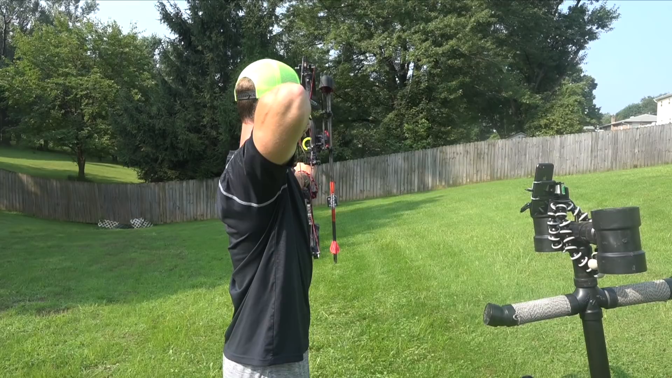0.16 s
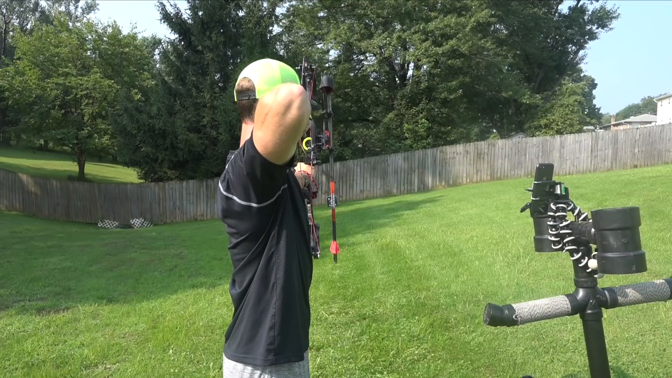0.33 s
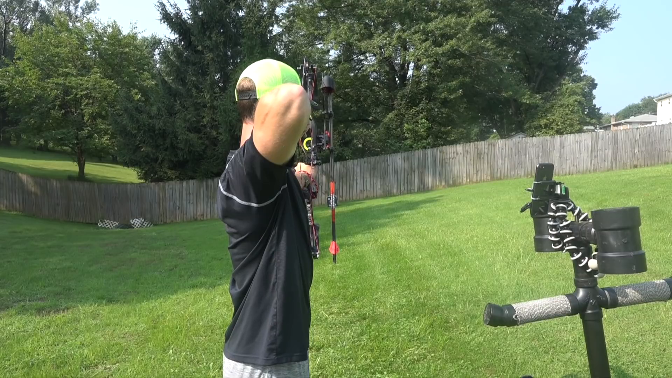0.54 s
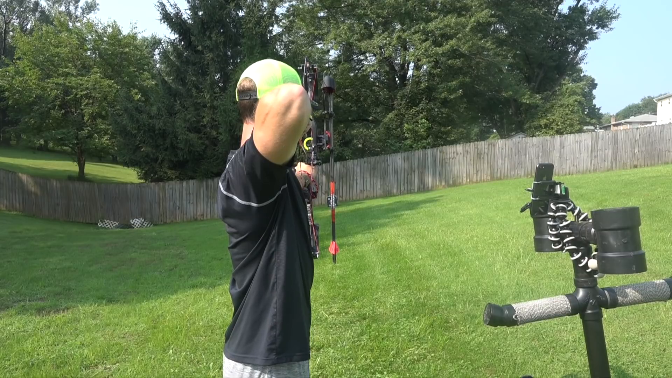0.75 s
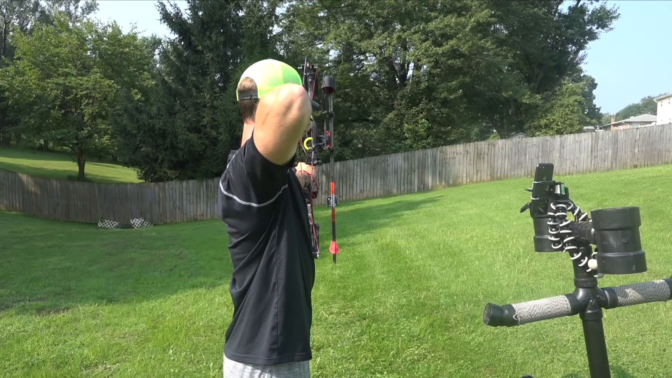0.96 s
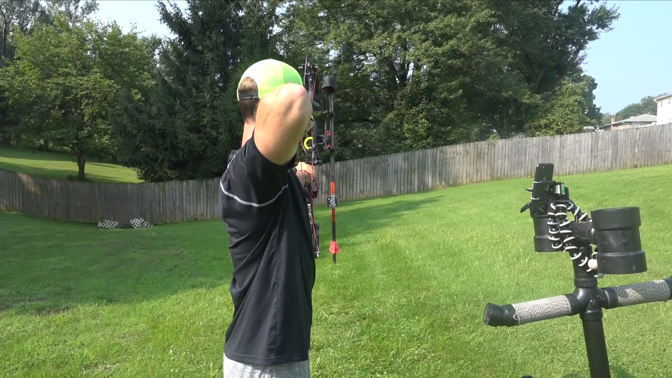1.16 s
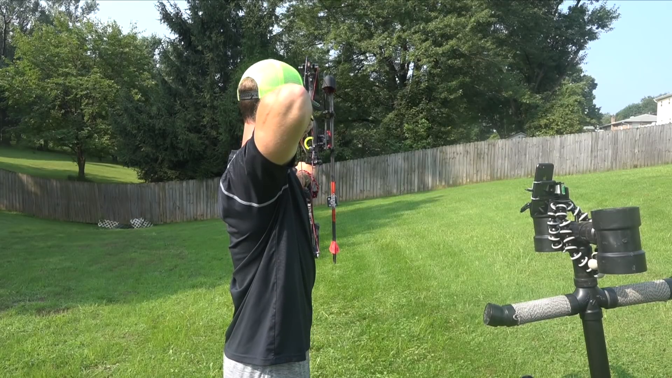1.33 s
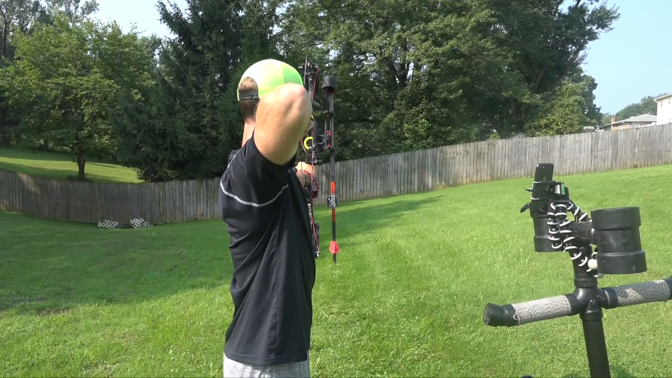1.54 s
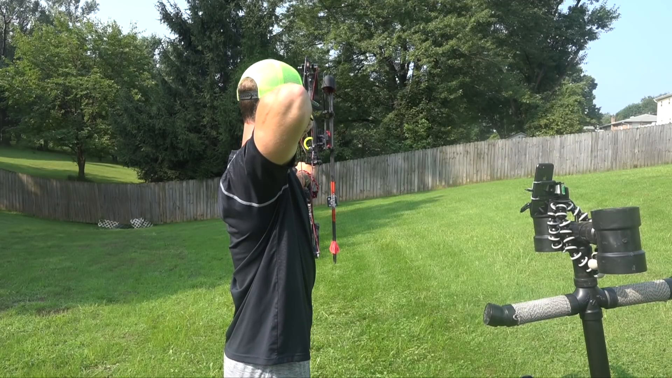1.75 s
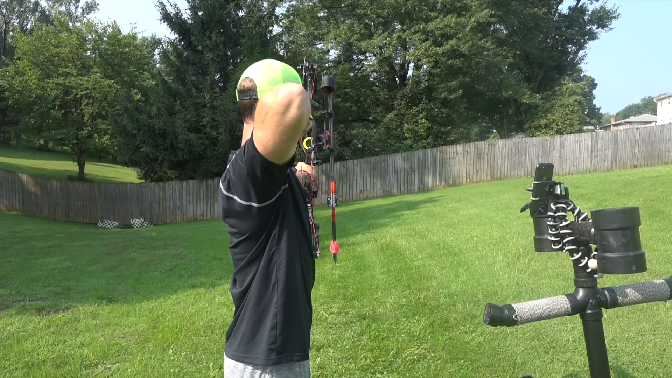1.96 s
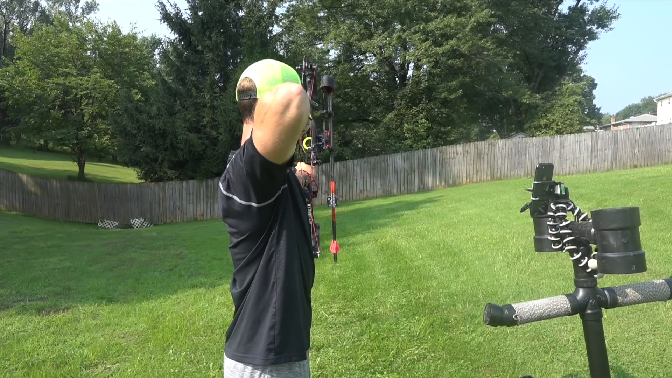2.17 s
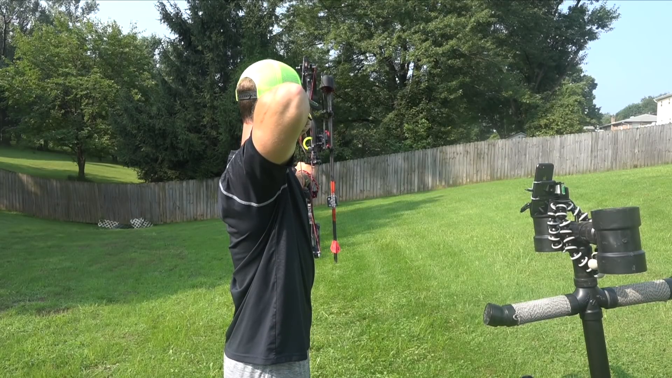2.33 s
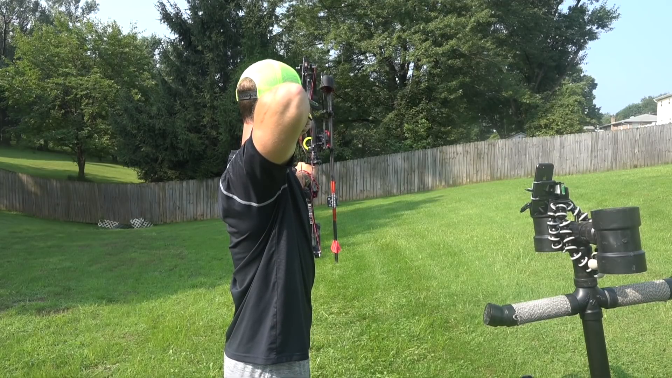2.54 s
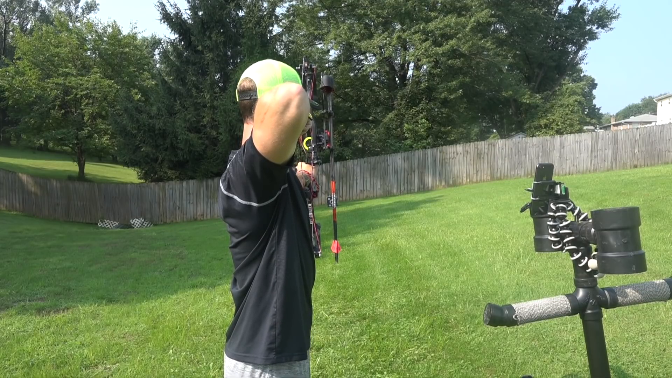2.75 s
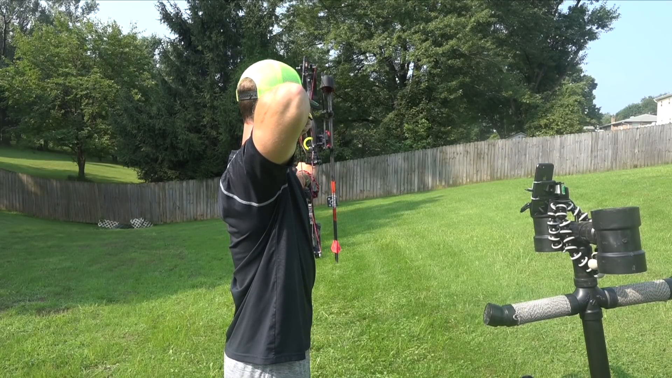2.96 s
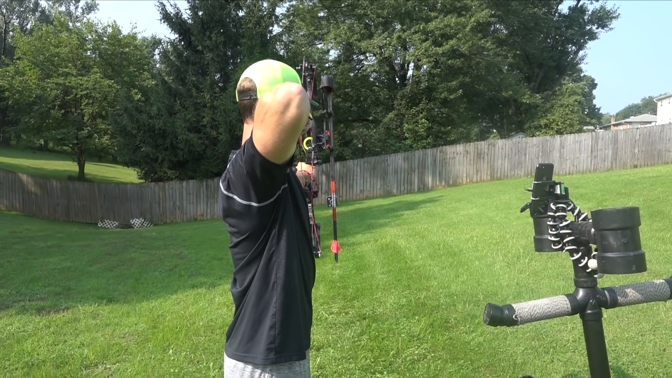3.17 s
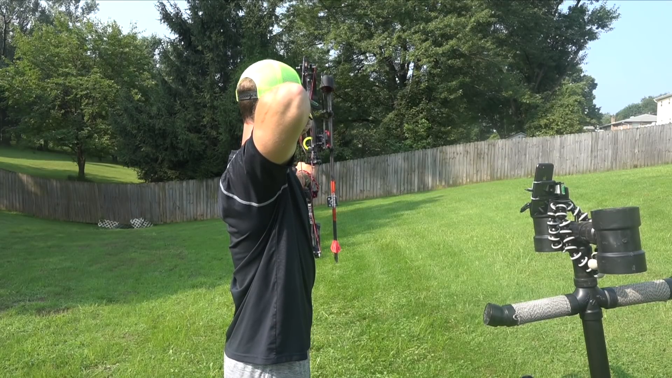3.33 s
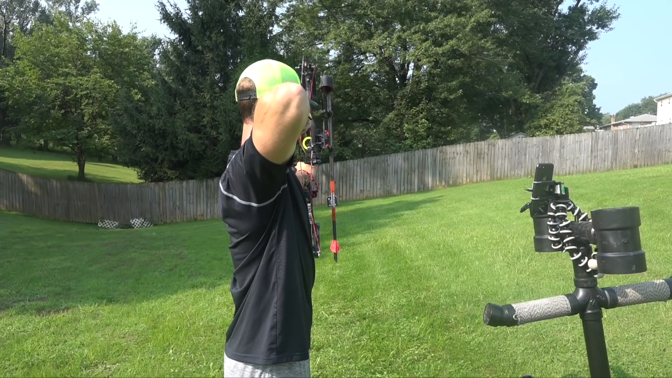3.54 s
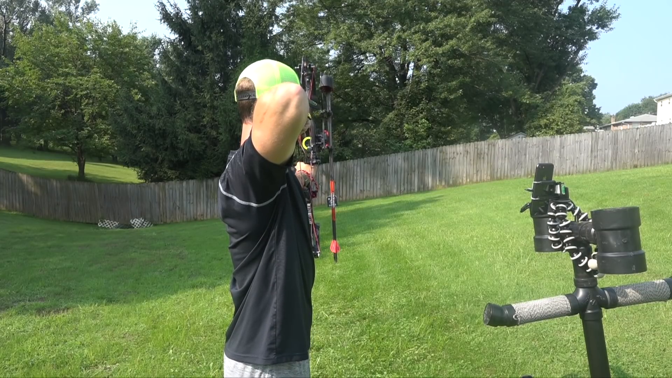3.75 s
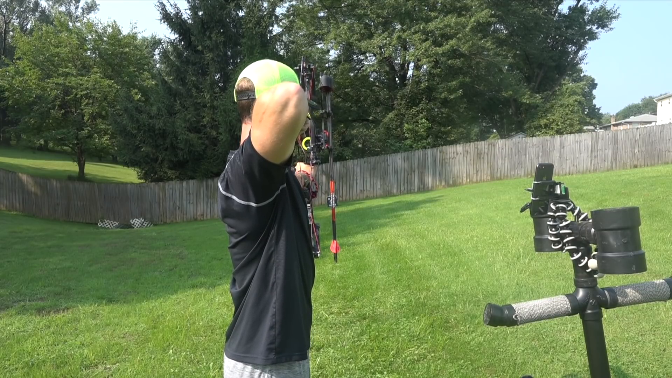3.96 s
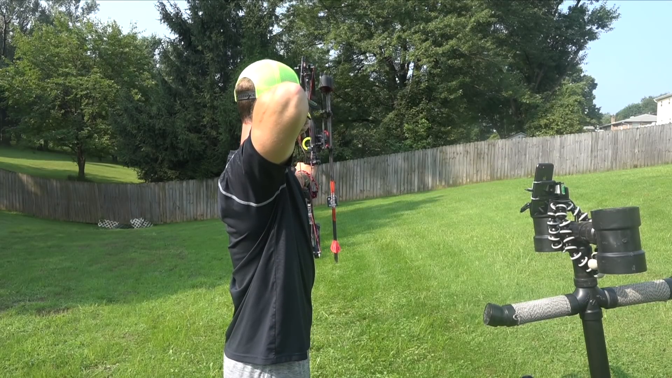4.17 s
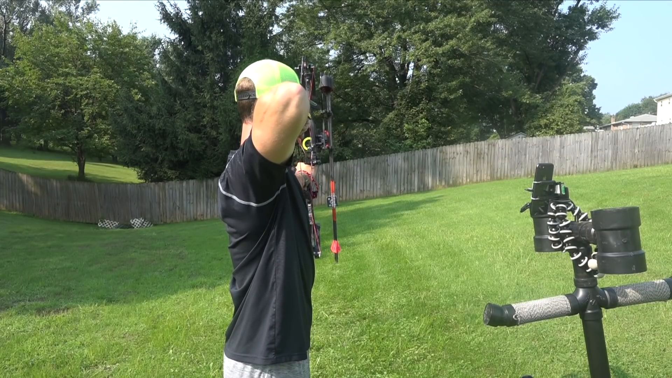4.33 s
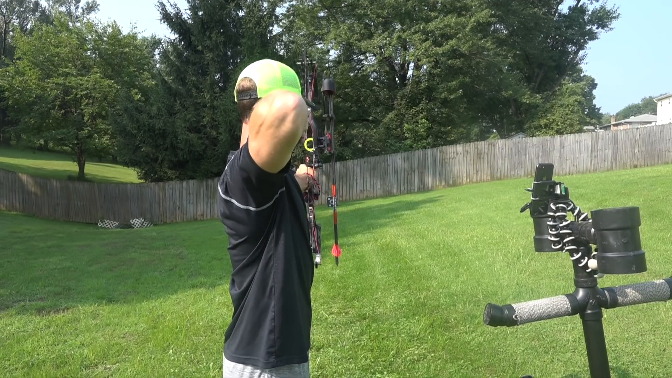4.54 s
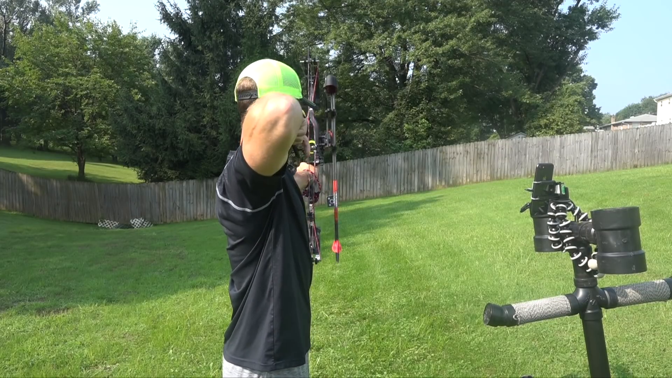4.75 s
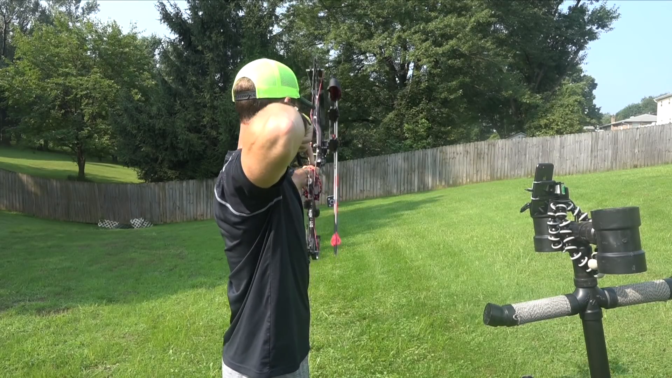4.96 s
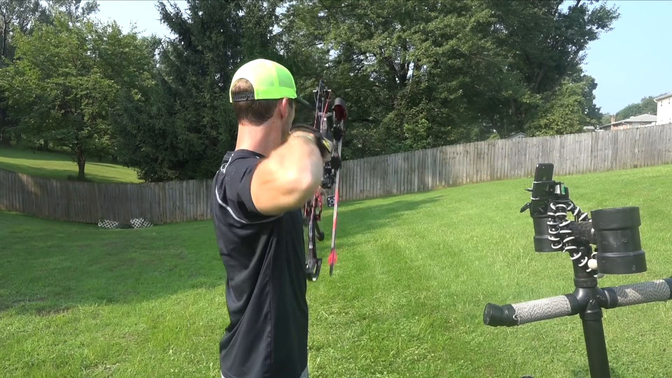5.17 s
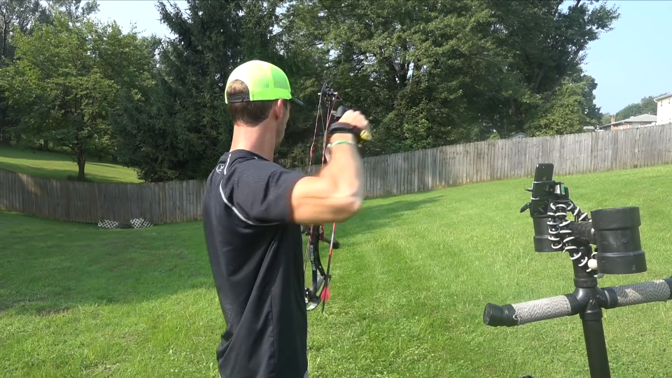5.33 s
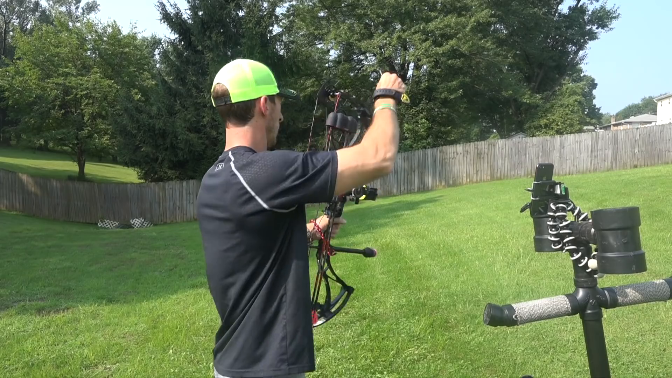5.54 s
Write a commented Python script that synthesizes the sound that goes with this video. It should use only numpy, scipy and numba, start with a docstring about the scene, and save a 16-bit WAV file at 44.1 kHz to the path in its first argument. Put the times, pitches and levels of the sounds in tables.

```python
"""A backyard. A compound bow is shot: the release clicks, the string slams into its stop and rings
the limbs, a fence echoes the cracks and the arrow thuds into a foam target. A bird whistles, a cricket
and a katydid stroke their wings, far traffic and insect choirs rush, wind buffets the microphone ports.
A gain control ducks on the loud blows and creeps back."""
import sys
import numpy as np
from scipy import signal
from scipy.fft import rfft, irfft, next_fast_len
from scipy.io import wavfile
from scipy.ndimage import uniform_filter1d, map_coordinates
from numba import njit

SR = 44100
rng = np.random.default_rng(int(sys.argv[2]) if len(sys.argv) > 2 else 0)


def wav_out(sig):
    """Save sig, one row per channel (or a flat mono array), as 16-bit PCM at SR to the path in sys.argv[1]."""
    wavfile.write(sys.argv[1], SR, np.round(np.clip(np.atleast_2d(sig).T, -1, 1) * 32767).astype(np.int16))


N = 251325

# Release jaw, string stop, cable slaps. Each row: start in seconds, relative level in dB, t60 in seconds.
BOW_CONTACTS = [(4.4212, -6, 0.0097), (4.423, -6.5, 0.037), (4.4454, 13, 0.003), (4.4475, 14.5, 0.004),
                (4.449, 15, 0.0081), (4.4503, 9, 0.004), (4.4538, 6, .004), (4.4655, 6, 0.004),
                (4.489, -2.5, 0.0085), (4.5, -9, 0.0095)]
# Bow limb modes. Each row: frequency in Hz, relative level in dB, t60 in seconds.
LIMB_MODES = [(230, -2, 0.076), (375, -4, 0.22), (584, -5.5, 0.085), (467, -10, .09), (716, 5.5, 0.07),
              (963, -8, 0.17), (1130, -12, 0.034), (1440, -27, 0.072), (2140, -21, 0.08),
              (3530, -15, 0.072)]
# Colour of the bow's noises. Each row: frequency in Hz, relative gain in dB.
CRACK_SPECTRUM = [(88, -24), (150, -12), (466, -7.5), (745, -14), (837, -10), (2450, -15), (3220, -12),
                  (4500, -10), (7000, -18), (11900, -20.5), (16000, -21)]
# Buzz of cables and sight. Each row: frequency in Hz, t60 in seconds.
RATTLE_DECAY = [(200, 0.17), (1000, 0.29), (4000, 0.13), (9000, 0.11), (12000, .07), (15000, 0.04)]
# Tip strike, then shaft slap. Each row: start in seconds, relative push level in dB,
# loss per later push in dB, relative tick level in dB.
ARROW_BLOWS = [(4.7295, 5.5, 4, 9.5), (4.7427, 0, 3.5, -2)]
# Foam block modes. Each row: frequency in Hz, width in Hz, relative gain in dB.
TARGET_MODES = [(160, 27, 16), (373, 34, 1), (497, 39, 6.5), (835, 54, 5), (1210, 210, -8), (2160, 770, 1),
                (3270, 590, -10), (5100, 1500, 0.5)]
# Scatter from the garden and from far trees. Each row: frequency in Hz, t60 in seconds.
GARDEN_DECAY = [(200, 0.12), (1000, 0.11), (5000, 0.18), (14000, 0.16)]
WOODS_DECAY = [(1500, 0.34), (4000, 0.41)]
# Bird glides. Each row: start and length in seconds, first and last pitch in Hz,
# first and last relative level in dB.
BIRD_WHISTLES = [(3.02, .1, 2800, 2520, -49, -52), (3.178, .1, 3450, 2930, -39, -45),
                 (3.14, .23, 2540, 2460, -55, -51), (3.48, .115, 2780, 2380, -49, -49),
                 (3.73, .045, 1800, 2150, -47, -46), (3.776, .02, 2900, 3400, -38, -37),
                 (2.755, .025, 2700, 2750, -47, -45), (3.65, .1, 2700, 2350, -56, -55),
                 (3.41, .035, 3300, 3000, -52, -53), (4.33, .065, 1450, 1650, -52, -47),
                 (3.805, .21, 3350, 2270, -46, -42), (4.09, .092, 1450, 2100, -51, -35),
                 (4.21, .075, 3350, 2500, -35, -50), (4.39, .04, 3400, 2850, -46, -50),
                 (4.4, .025, 1800, 2000, -40, -40), (4.65, .055, 3400, 2620, -42, -46),
                 (4.62, .075, 1500, 2020, -50, -38), (4.745, .05, 3000, 2550, -45, -42),
                 (4.91, .04, 3300, 2700, -45, -49)]
# Short bird notes. Each row: middle and length in seconds, relative level in dB.
BIRD_PIPS = [(3.155, .05, -43), (3.24, .04, -47), (3.3, .05, -46), (3.35, .03, -47), (3.395, .05, -45),
             (3.805, .035, -35), (3.92, .03, -46), (3.975, .03, -42), (4.035, .035, -42), (4.07, .025, -46),
             (4.208, .045, -28), (4.305, .03, -43), (4.34, .045, -45), (4.385, .04, -39),
             (4.595, .035, -40), (4.645, .035, -39), (4.725, .04, -33), (4.85, .03, -45), (4.89, .045, -42)]
# Bursts of chips. Each row: start and length in seconds, base pitch in Hz, relative level in dB.
BIRD_CHIPS = [(.708, .07, 3250, -43), (1.18, .09, 1350, -48), (2.72, .06, 3300, -44)]
# Cricket tempo. Each row: time in seconds, wing strokes so far.
CRICKET_STROKES = [(0.0371, 0), (1.2095, 24), (2.4003, 48), (2.7059, 54), (3.3247, 66), (3.6228, 72),
                   (4.2323, 84), (5.6951, 113)]
# Katydid wing bands. Each row: centre in Hz, width in Hz, relative level in dB.
KATYDID_BANDS = [(3387, 110, 0.5), (4030, 106, 1), (4660, 200, -4.5), (5250, 260, -4)]
# Swell of the katydid and of the far insects. Each row: time in seconds, level in dB.
KATYDID_LEVELS = [(0, -43), (1, -44.5), (2, -43), (2.8, -45.5), (3.3, -44.5), (3.9, -64), (5.7, -56)]
FAR_INSECT_LEVELS = [(0, -42), (2, -41.5), (3.8, -45), (4.9, -41.5), (5.3, -50), (5.7, -49)]
# Traffic swell. Each row: time in seconds, tyre level in dB, rumble level in dB.
TRAFFIC_LEVELS = [(0, -36.5, -35.5), (.6, -37.5, -36.5), (1.2, -36, -34), (2, -36, -33),
                  (3.2, -34.5, -32.5), (4, -35, -34), (4.6, -32.5, -31), (5.3, -32.5, -32.5),
                  (5.7, -32.5, -34)]
# Noise bed spectra. Each row: frequency in Hz, relative density in dB.
RUMBLE_SPECTRUM = [(26, -48), (45, 2), (64, -4.5), (107, 1.5), (139, -7.5), (166, 0), (194, -7),
                   (231, -4.5), (263, -15), (300, -9.5), (360, -28), (470, -52), (790, -120)]
TYRE_SPECTRUM = [(190, -5), (330, -2), (371, -2), (525, -2.5), (564, -4), (931, 0.5), (2210, -12.5),
                 (2900, -15), (3770, -25), (6380, -120)]
FAR_INSECT_SPECTRUM = [(1590, -58), (2700, -6.5), (3400, 0), (4700, -1.5), (6110, -2.5), (10300, -120)]
NEAR_INSECT_SPECTRUM = [(3500, -32), (4500, -15), (5300, -5.5), (5900, -2), (6500, 4), (7100, -2.5),
                        (7700, -0.5), (8300, -4.5), (9200, -10), (9900, -11.5), (10700, -29),
                        (11300, -19.5), (12500, -19), (15000, -18.5), (16000, -25)]
WIND_SPECTRUM = [(2, -24), (6, 4), (14, 2.5), (24, -3), (40, -16), (70, -29), (120, -87)]
# Stereo width of traffic and choirs. Each row: frequency in Hz, left-right correlation.
BED_CORRELATION = [(60, 0.77), (110, 0.99), (200, 0.93), (380, 0.85), (700, 0.94), (1290, 1), (2380, 0.96),
                   (4400, 0.51), (8120, 0.13), (15000, 0.042)]
# Their stereo balance. Each row: frequency in Hz, left over right in dB.
BED_BALANCE = [(60, 0), (180, 2.0), (550, 0), (1650, 0.0), (4970, -1.0), (15000, 0)]
# Gusts on the ports. Each row: peak time in seconds, peak level in dB, length in seconds.
WIND_GUSTS = [(.1, -23, 0.67), (0.424, -20, 0.069), (0.545, -9.5, 0.05), (0.747, -20.5, 0.064),
              (1.026, -30, 0.29), (1.384, -20, 0.084), (1.723, -14.5, 0.054), (1.856, -28, 0.17),
              (2.195, -39.5, 0.3), (2.746, -23, 0.11), (3.002, -19.5, 0.086), (3.214, -25, 0.093),
              (3.565, -33, 0.19), (3.803, -28, 0.3), (4.204, -21, 0.14)]


def bow(travel_s=4.437, slam_s=4.447, hiss_db=-8, rattle_db=24):
    """Each contact cracks; the string hisses to its stop, rattles the fittings and rings the limbs."""
    cracks, t = np.zeros(N), np.arange(SR // 2) / SR
    for start_s, db, t60_s in BOW_CONTACTS:
        top_hz = 14000 / (1 + max(0, start_s - slam_s) / .06)  # duller after the slam
        crack = amp(db - 60 * t / t60_s) * rng.standard_normal(len(t))
        add(cracks, start_s, signal.lfilter(*signal.butter(2, top_hz, fs=SR), crack))
    rise = t[t < slam_s - travel_s] / (slam_s - travel_s)
    hiss = amp(hiss_db) * (.3 + .7 * rise) * rng.standard_normal(len(rise))
    noises = cracks + fence_echo(cracks)
    add(noises, travel_s, hiss)
    buzz = noise_tails(RATTLE_DECAY)[0]
    knocks = amp(rattle_db + 4.7 * wobble(591)[:len(buzz)])
    add(noises, slam_s, knocks * buzz)
    return limbs(slam_s) + filtered(noises, lambda hz: amp(along(CRACK_SPECTRUM, hz) + 12.5))


def limbs(slam_s, gain_db=-2, build_cycles=.6):
    """Limb modes swing up and decay; loose parts blur their pitch."""
    ring, t = np.zeros(N), np.arange(SR // 2) / SR
    for hz, db, t60_s in LIMB_MODES:
        drift_rad = np.cumsum(rng.normal(0, 0.017, len(t)))
        envelope = amp(gain_db + db - 60 * t / t60_s) * (1 - np.exp(-t * hz / build_cycles))
        add(ring, slam_s, envelope * np.sin(2 * np.pi * hz * t + drift_rad))
    return ring


def arrow(pushes_per_blow=4, whip_s=.0044, tick_t60_s=0.0024, slide_s=0.018, slide_db=-15):
    """Tip and whipping shaft push air, tick and scrape into the foam block, which rings on."""
    pushes, ticks, t = np.zeros(N), np.zeros(N), np.arange(SR // 20) / SR
    for start_s, push_db, loss_db, tick_db in ARROW_BLOWS:
        for k in range(pushes_per_blow):
            period_ms = 1.25 + .3 * k
            swing = (-1) ** (k + 1) * np.sin(2 * np.pi * np.clip(t * 1000 / period_ms, 0, 1))
            add(pushes, start_s + whip_s * k * rng.normal(1, .05), amp(push_db - loss_db * k) * swing)
        add(ticks, start_s, amp(tick_db - 60 * t / tick_t60_s) * rng.standard_normal(len(t)))
    scrape = amp(slide_db) * np.clip(1.3 - (t / slide_s) ** 2, 0, 1) * rng.standard_normal(len(t))
    add(ticks, ARROW_BLOWS[0][0], scrape)
    ticks = signal.lfilter(*signal.butter(2, 8500, fs=SR), ticks)  # dulled by distance and foam
    block = lambda hz: sum(amp(db) * 1j * hz * width_hz / (mode_hz ** 2 - hz ** 2 + 1j * hz * width_hz)
                           for mode_hz, width_hz, db in TARGET_MODES)
    return amp(-4) * pushes + filtered(amp(-6.5) * pushes + ticks, block) + amp(-7) * ticks


def fence_echo(cracks, distance_m=20.6, gain_db=-15, band_hz=(1300, 7160), smear_t60_s=0.0071):
    """The fence returns the cracks late, weaker and duller, smeared by its uneven boards."""
    echo, t = np.zeros(N), np.arange(SR // 2) / SR
    dulled = signal.lfilter(*signal.butter(2, band_hz, 'band', fs=SR), cracks)
    boards = amp(-60 * t / smear_t60_s) * rng.standard_normal(len(t))
    smeared = signal.fftconvolve(dulled, boards / np.linalg.norm(boards))[:N]
    add(echo, 2 * distance_m / 343, amp(gain_db) * smeared)
    return echo


def garden(x):
    """Fence, trees and houses scatter a sound back, much alike at both ports."""
    tails = noise_tails(GARDEN_DECAY)
    return reverberate(x, (tails + 5.7 * tails[0]) / 3.8)


def bird_whistles(bend=1.9, edge_s=0.008):
    """Pure glides that slow towards their end; many paths through the trees blur the pitch."""
    song = np.zeros(N)
    for start_s, length_s, first_hz, last_hz, first_db, last_db in BIRD_WHISTLES:
        t = np.arange(round(length_s * SR)) / SR
        hz = last_hz + (first_hz - last_hz) * (1 - t / length_s) ** bend
        blur_rad = np.cumsum(rng.normal(0, .04, len(t)))
        gate = np.clip(np.minimum(t, length_s - t) / edge_s, 0, 1)
        level = amp(first_db + (last_db - first_db) * t / length_s)
        add(song, start_s, gate * level * np.sin(phase(hz) + blur_rad))
    return song


def bird_pips(pitch_hz=3400, faint_count=26, faint_from_s=3.1, faint_to_s=4.95):
    """Short, nearly level notes, with fainter ones at random between them."""
    song = np.zeros(N)
    faint = [(faint_from_s + (faint_to_s - faint_from_s) * when, .035, -52 + 6 * (loudness - .5))
             for when, loudness in rng.random((faint_count, 2))]
    for middle_s, length_s, db in list(BIRD_PIPS) + faint:
        t = np.arange(round(length_s * SR)) / SR
        hz = pitch_hz * rng.normal(1, 0.006) + 1500 * rng.normal() * (t - length_s / 2)
        blur_rad = np.cumsum(rng.normal(0, .05, len(t)))
        add(song, middle_s - length_s / 2, amp(db) * np.hanning(len(t)) * np.sin(phase(hz) + blur_rad))
    return song


def bird_chips(step_s=.016, arch=.22, spread=0.03):
    """Bursts of scratchy chips, pitched highest in mid-burst."""
    song, t = np.zeros(N), np.arange(SR // 40) / SR
    for start_s, length_s, base_hz, db in BIRD_CHIPS:
        for at_s in np.arange(start_s, start_s + length_s, step_s):
            scratch = 1 + .8 * unit(uniform_filter1d(rng.standard_normal(len(t)), size=90))
            hz = base_hz * (1 + arch * np.sin(np.pi * (at_s - start_s) / length_s))
            tone = np.sin(2 * np.pi * hz * rng.normal(1, spread) * t)
            add(song, at_s - t[-1] / 2, amp(db) * np.hanning(len(t)) * scratch * tone)
    return song


def bird(waver_db=2.5, woods_db=-1):
    """The song wavers through the leaves; far trees smear it."""
    song = np.sqrt(2) * (bird_whistles() + bird_pips() + bird_chips()) * amp(waver_db * wobble(35))
    return song + amp(woods_db) * reverberate(song, noise_tails(WOODS_DECAY))


def cricket(left_db=-37, right_db=-34.5, top_hz=8830, sag_hz=260, duty=0.43):
    """Each wing stroke is a short tone whose pitch arches up, then sags."""
    times_s, counts = np.transpose(CRICKET_STROKES)
    lead_in = (times_s[0] - (times_s[1] - times_s[0]), -counts[1])  # already singing at the start
    strokes, = curves([lead_in] + list(CRICKET_STROKES))
    position = (strokes - np.round(strokes)) / (duty / 2)  # -1..1 within a stroke
    swell = np.clip(2.46 * (1 - np.abs(position)), 0, 1) ** 1.4
    hz = top_hz - sag_hz * np.clip(position + 0.1, -1.3, 1.3) ** 2 + 15 * wobble(7.5)
    tone = amp(1.4 * wobble(22)) * swell * np.sin(phase(hz))
    return np.array([amp(left_db) * np.roll(tone, 1), amp(right_db) * tone])  # right port hears it first


def katydid(beat_hz=11.7, accent=0.33, depth=0.44):
    """Far wings chatter in narrow bands, a strong and a weak stroke to each beat."""
    beat_rad = phase(beat_hz * (1 + 0.032 * wobble(2.0)))
    strokes = 1 + depth * np.cos(2 * beat_rad) + accent * np.cos(beat_rad)
    mid, side = rng.standard_normal((2, N))
    rasp = strokes * np.array([mid + .5 * side, mid - .5 * side])
    wings = lambda hz: sum(amp(db) * np.exp(-((hz - centre_hz) / width_hz) ** 2)
                           for centre_hz, width_hz, db in KATYDID_BANDS)
    return amp(curves(KATYDID_LEVELS)[0]) * unit(filtered(rasp, wings))


def traffic():
    """Far traffic: rumble and tyre rush, each with its own slow swell."""
    tyre_db, rumble_db = curves(TRAFFIC_LEVELS)
    rumble = amp(rumble_db + 0.21 * wobble(4.0)) * noise_bed(RUMBLE_SPECTRUM, patchy_db=0.3)
    tyres = amp(tyre_db + 0.067 * wobble(6.06)) * noise_bed(TYRE_SPECTRUM, patchy_db=0.8)
    return rumble + tyres


def insect_choirs(near_db=-36):
    """Far and near insects merge into two beds of high noise."""
    far_db, = curves(FAR_INSECT_LEVELS)
    far = amp(far_db + 0.7 * wobble(12)) * noise_bed(FAR_INSECT_SPECTRUM, patchy_db=1.0)
    near = amp(near_db + 0.29 * wobble(10)) * noise_bed(NEAR_INSECT_SPECTRUM, patchy_db=0.64)
    return far + near


def wind(lull_db=-36, swing_db=2.5, gust_pan_db=-8.5, lull_pan_db=-2):
    """Gusts thump the microphone ports, harder on the right, over a wandering lull."""
    t = np.arange(N) / SR
    gusts = sum(amp(db) * np.exp(-np.abs(2 * (t - peak_s) / length_s) ** 0.99)
                for peak_s, db, length_s in WIND_GUSTS)
    lull = amp(lull_db + swing_db * wobble(5))
    strength = gusts * pan(gust_pan_db) + lull * pan(lull_pan_db + 5.9 * wobble(10))
    return strength * noise_bed(WIND_SPECTRUM, patchy_db=0.4, correlation=[(10, 0.63)])


def noise_bed(spectrum, patchy_db, correlation=BED_CORRELATION):
    """Stereo noise of rms 1 with time-frequency patches of random gain."""
    bins = signal.stft(rng.standard_normal((2, N)), nperseg=512)[2]
    patches = uniform_filter1d(rng.standard_normal(bins.shape[1:]), size=6, axis=0)
    patches = uniform_filter1d(patches, size=12, axis=1)
    pair = signal.istft(bins * amp(patchy_db * unit(patches)), nperseg=512)[1][:, :N]
    angle = lambda hz: np.arccos(np.clip(along(correlation, hz), -1, 1)) / 2
    shape = lambda hz: amp(along(spectrum, hz)) * [np.cos(angle(hz)), np.sin(angle(hz))]
    mid, side = filtered(pair, shape)
    return unit(np.array([mid + side, mid - side]))


def noise_tails(decay):
    """Two noise tails of energy about 1, each frequency dying at its own rate."""
    hz, t, bins = signal.stft(rng.standard_normal((2, SR // 2)), SR, nperseg=128)
    tails = signal.istft(bins * amp(-60 * t / along(decay, hz)[:, None]), SR, nperseg=128)[1]
    return tails / np.linalg.norm(tails[0])


def reverberate(x, tails):
    """Mono x through a stereo pair of tails."""
    return signal.fftconvolve(x[None], tails, axes=1)[:, :N]


def amp(db):
    """Gain of a level in dB."""
    return 10 ** (np.asarray(db) / 20)


def pan(left_over_right_db):
    """Left and right gains."""
    return amp(left_over_right_db * np.array([[.5], [-.5]]))


def unit(x):
    """x at rms 1."""
    return x / np.sqrt(np.mean(x ** 2) + 1e-20)


def phase(hz):
    """Running phase in radians."""
    return 2 * np.pi * np.cumsum(hz) / SR


def along(points, hz):
    """Interpolates (Hz, value) points on a log frequency axis."""
    knots_hz, values = np.transpose(points)
    return np.interp(np.log(hz + 1), np.log(knots_hz + 1), values)


def curves(rows):
    """One value per sample for each column after the time."""
    times_s, *columns = np.transpose(rows)
    return [np.interp(np.arange(N) / SR, times_s, column) for column in columns]


def wobble(knots_per_s):
    """Smooth random curve."""
    knots = rng.standard_normal(int(N * knots_per_s / SR) + 4)
    return map_coordinates(knots, [np.arange(N) * knots_per_s / SR])


def filtered(x, response):
    """x through a complex response, a function of Hz."""
    size = next_fast_len(N + SR // 2)
    return irfft(rfft(x, size) * response(np.fft.rfftfreq(size, 1 / SR)), size)[..., :N]


def add(track, start_s, sound):
    """Mixes a sound into the track."""
    part = track[round(start_s * SR):][:len(sound)]
    part += sound[:len(part)]


@njit
def gain_control(wanted_db, attack_s, climb_db_per_s, start_db):
    """Gain in dB: sinks fast towards the wanted level, climbs back at a steady pace."""
    out_db, gain_db = np.empty(len(wanted_db)), start_db
    for i in range(len(wanted_db)):
        if wanted_db[i] < gain_db:
            gain_db += (wanted_db[i] - gain_db) / (attack_s * SR)
        else:
            gain_db = min(gain_db + climb_db_per_s / SR, wanted_db[i])
        out_db[i] = gain_db
    return out_db


def scene():
    """Shot and hit with their garden scatter, over bird, insects, traffic and wind."""
    shot, hit = bow(), arrow()
    blows = shot * pan(-.4) + amp(-12.5) * garden(shot) + hit * pan(-.6) + amp(-16) * garden(hit)
    singers = bird() + cricket() + katydid()
    beds = filtered(traffic() + insect_choirs(), lambda hz: pan(along(BED_BALANCE, hz)))
    return blows + singers + beds + wind()


def record(dry, knee_db=-24, slope=0.62, average_s=0.028, ahead_s=0.027, top_hz=15900):
    """Look-ahead gain control, soft clipping, band limit."""
    above_wind = filtered(dry.mean(0), lambda hz: hz > 150)
    smoothing = 1 / (average_s * SR)
    power = signal.lfilter([smoothing], [1, smoothing - 1], above_wind ** 2)
    wanted_db = np.minimum(0, slope * (knee_db - 10 * np.log10(power + 1e-12)))
    wanted_db = np.interp(np.arange(N) + ahead_s * SR, np.arange(N), wanted_db)
    ducked = dry * amp(gain_control(wanted_db, attack_s=0.0022, climb_db_per_s=3.5, start_db=-2.5))
    clipped = ducked / (1 + np.abs(ducked) ** 6) ** (1 / 6)
    return filtered(clipped, lambda hz: hz < top_hz)


dry = scene()
out = record(dry)
wav_out(out)
```